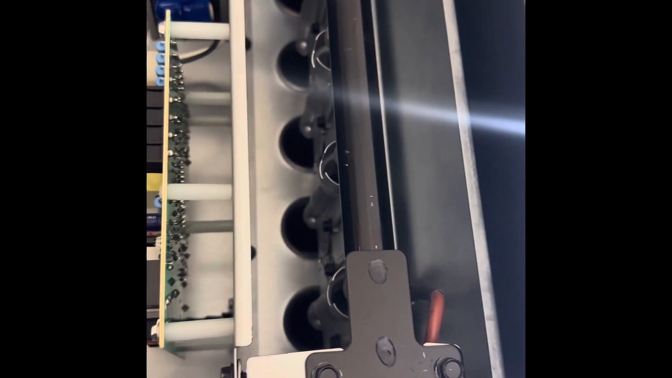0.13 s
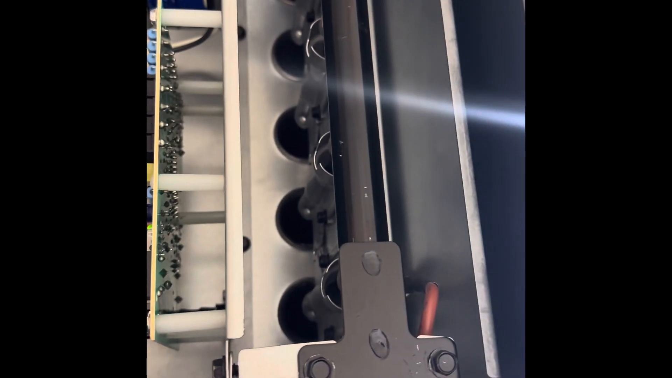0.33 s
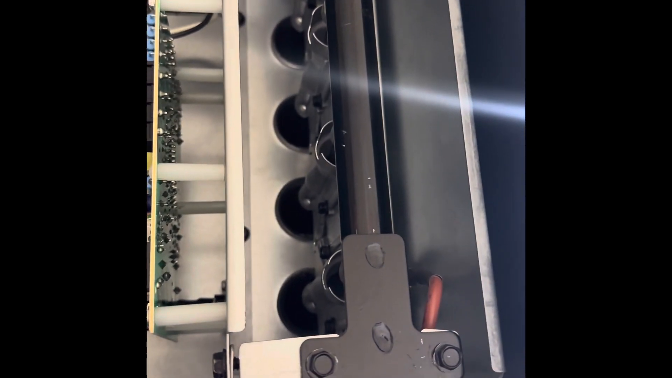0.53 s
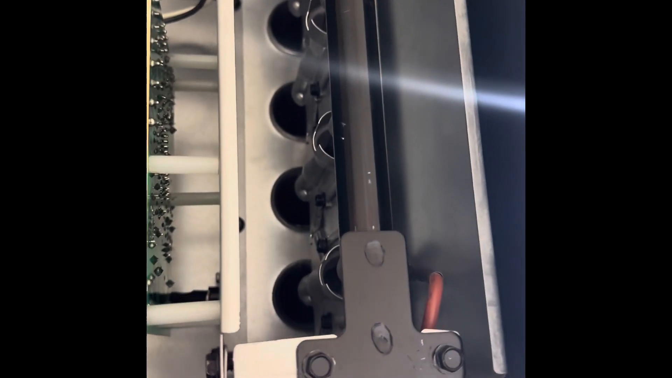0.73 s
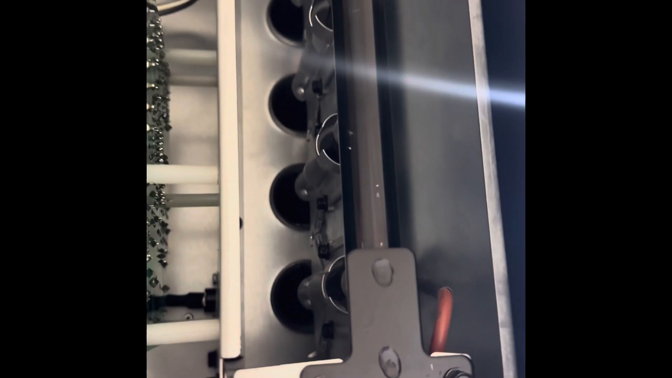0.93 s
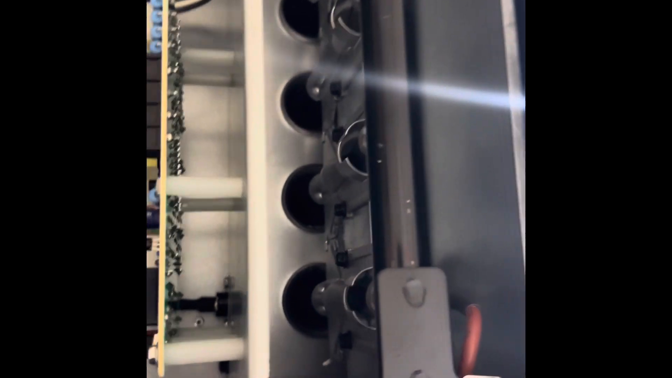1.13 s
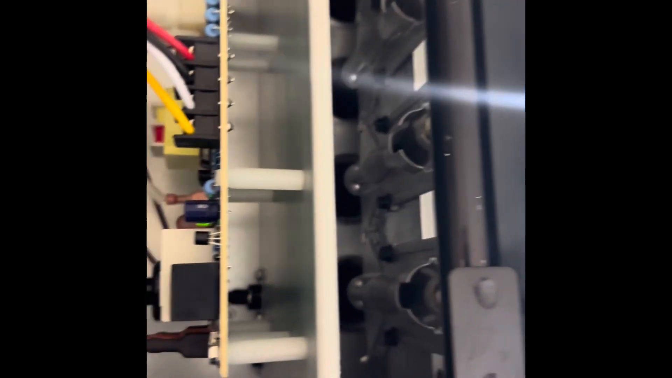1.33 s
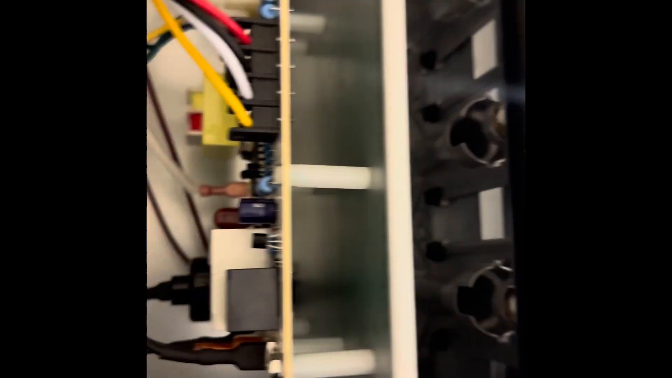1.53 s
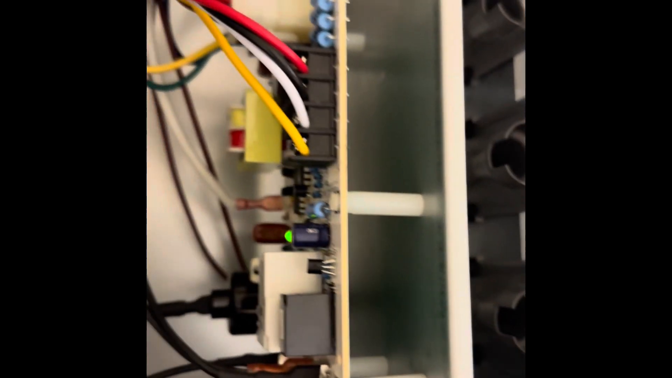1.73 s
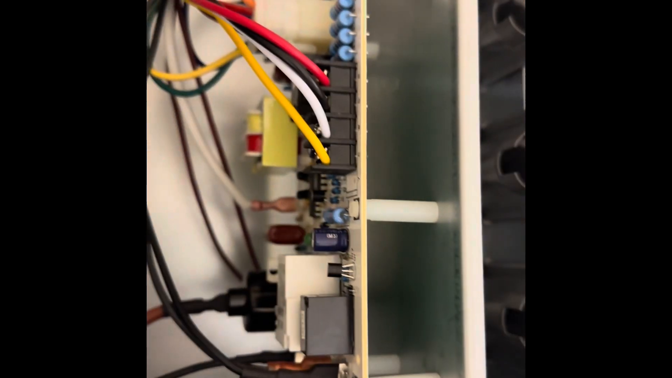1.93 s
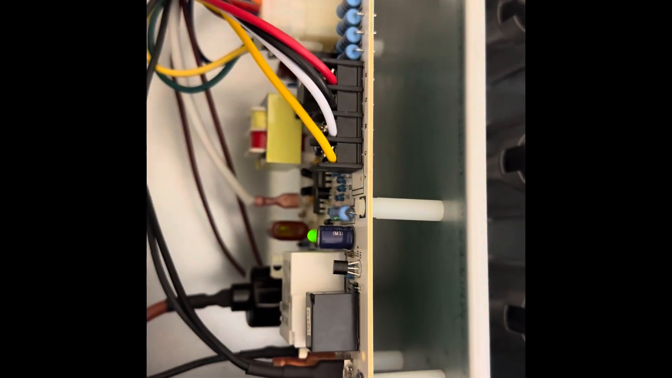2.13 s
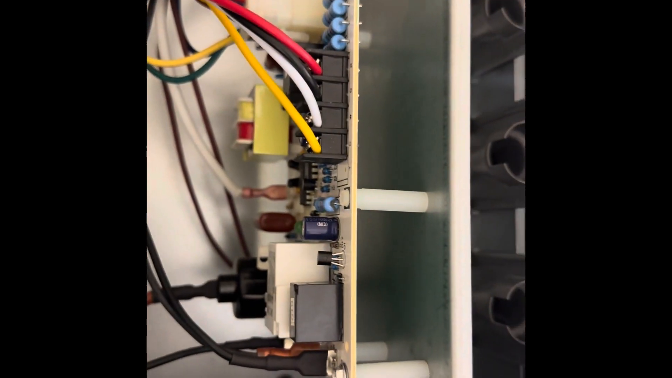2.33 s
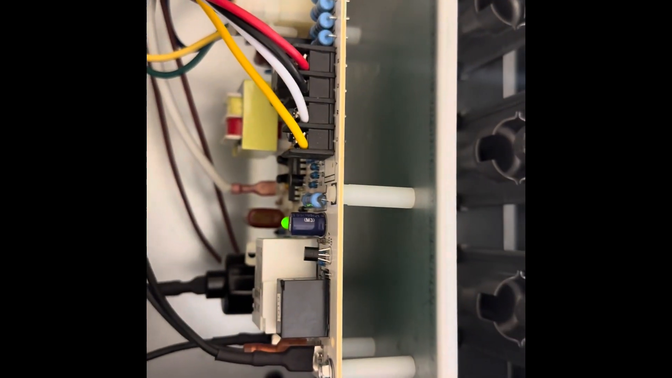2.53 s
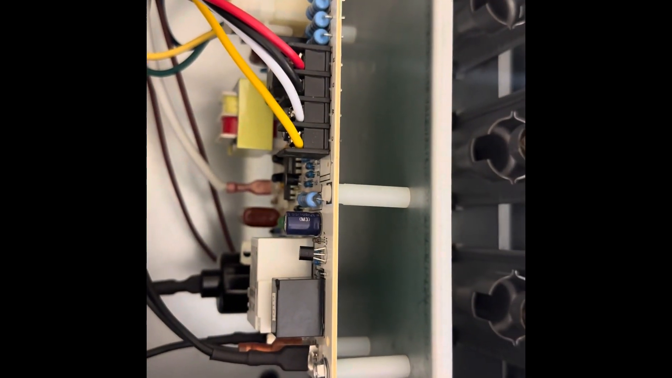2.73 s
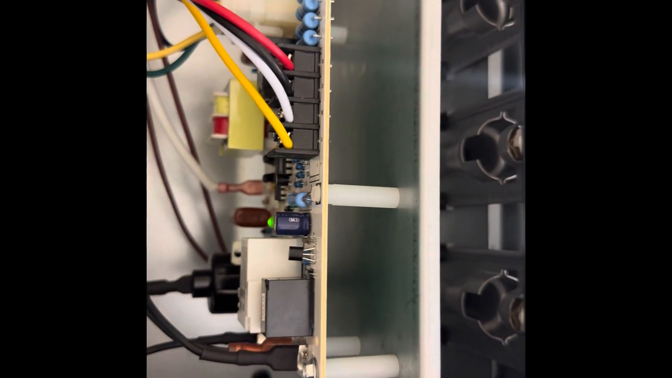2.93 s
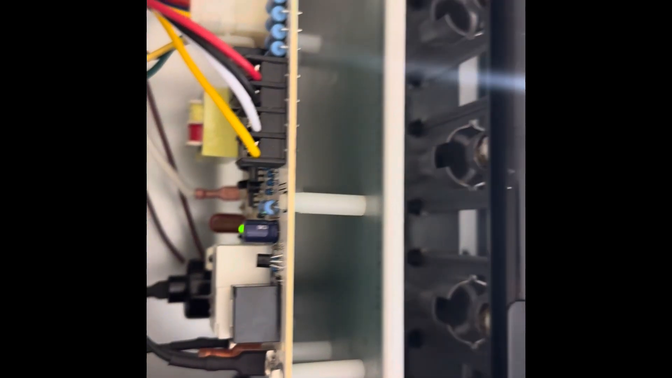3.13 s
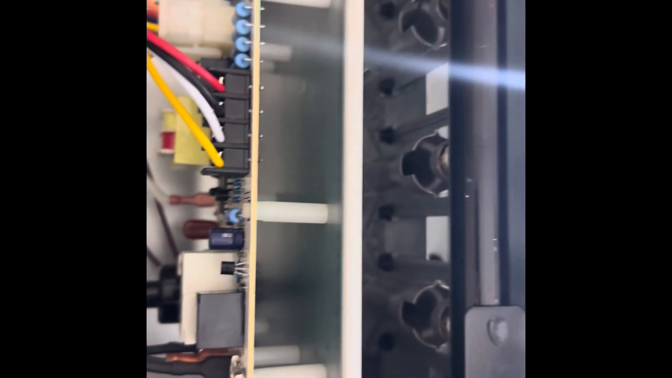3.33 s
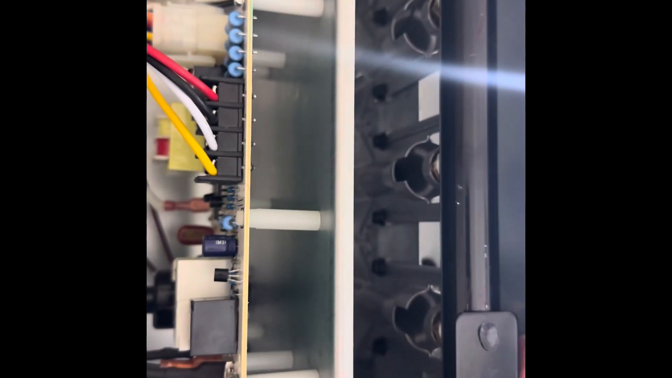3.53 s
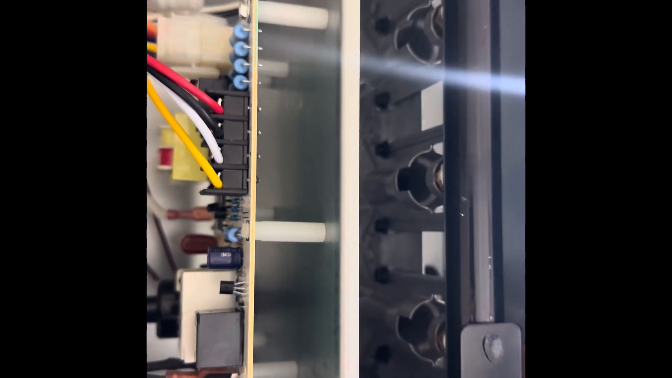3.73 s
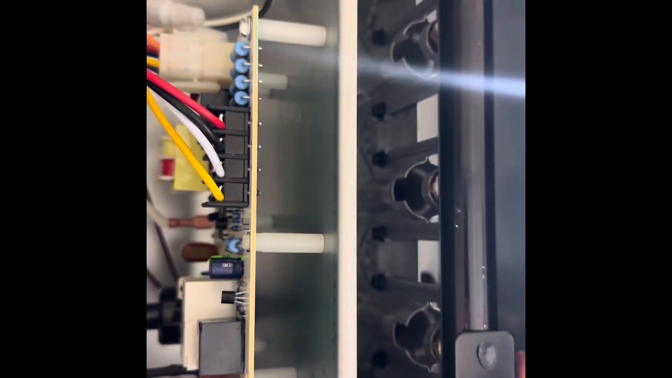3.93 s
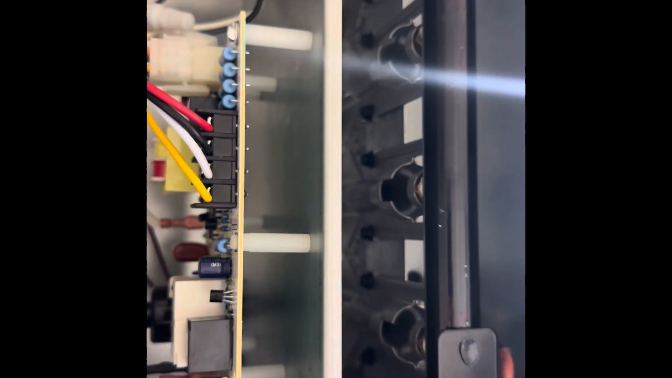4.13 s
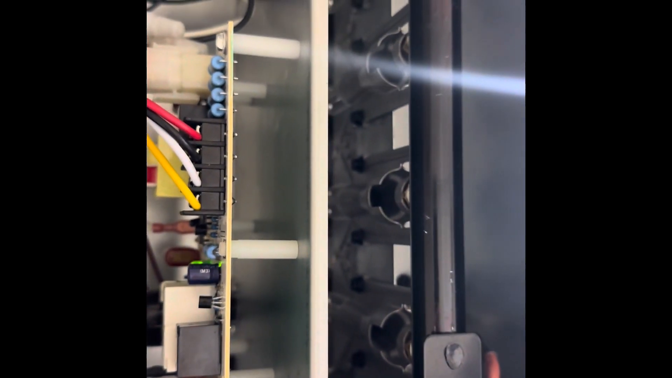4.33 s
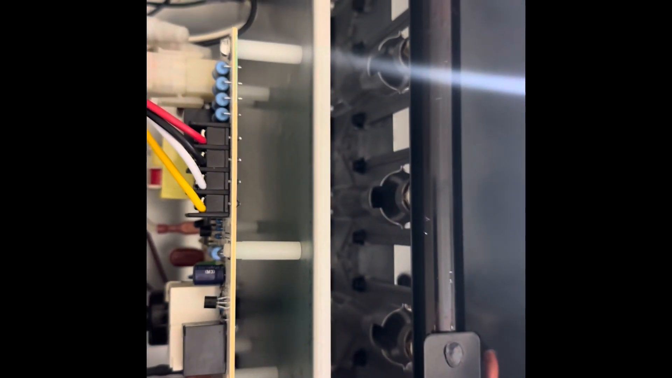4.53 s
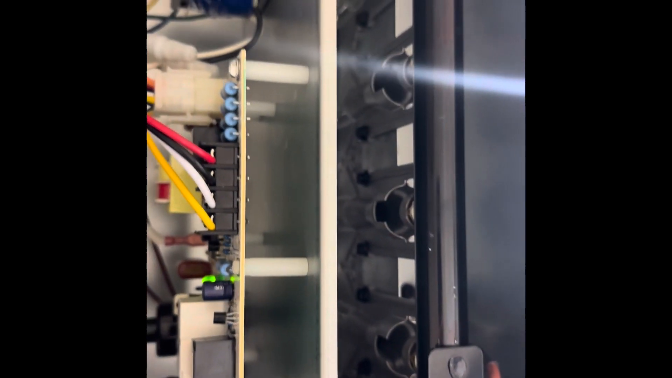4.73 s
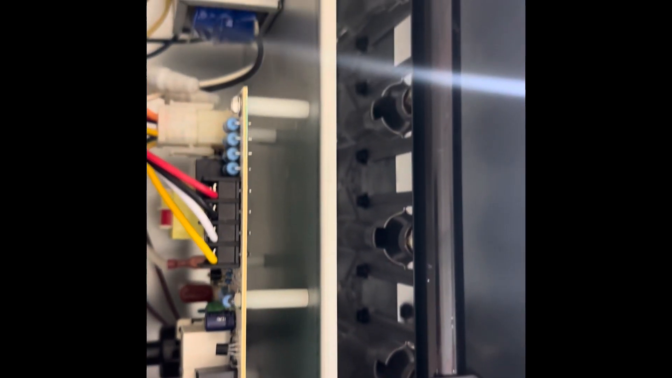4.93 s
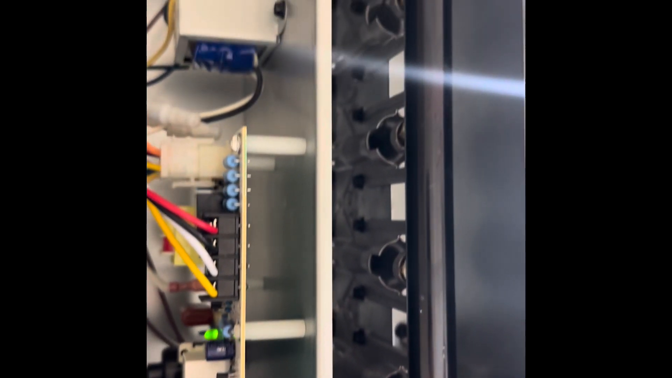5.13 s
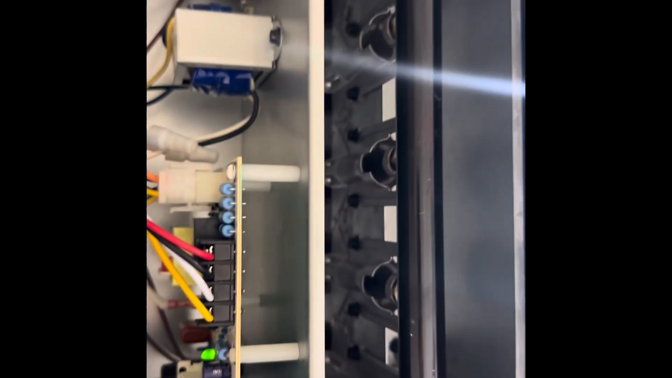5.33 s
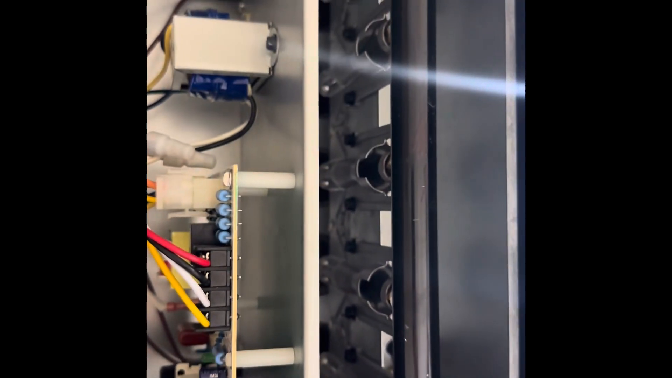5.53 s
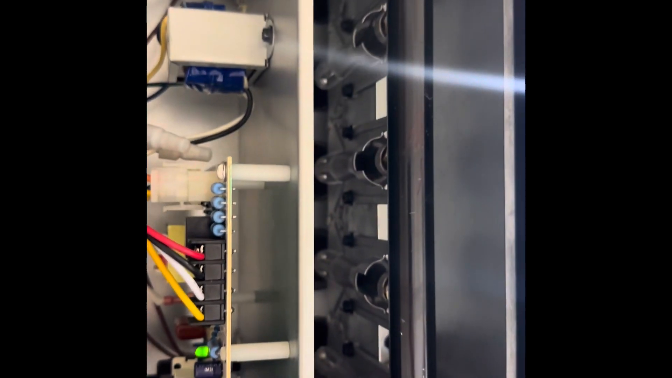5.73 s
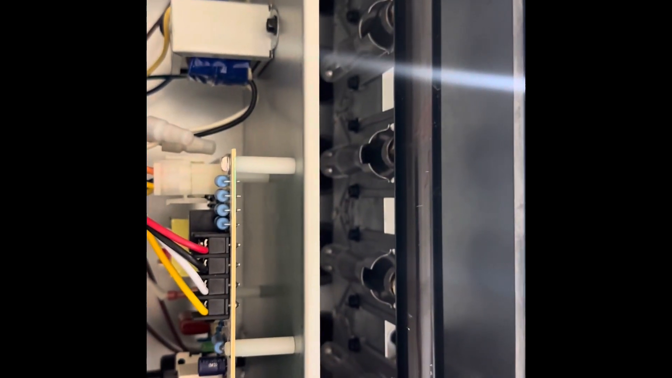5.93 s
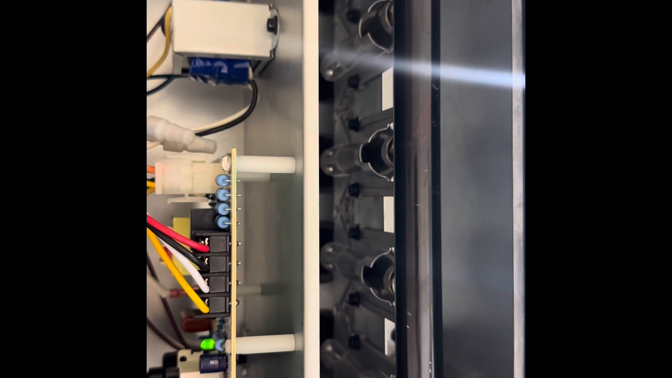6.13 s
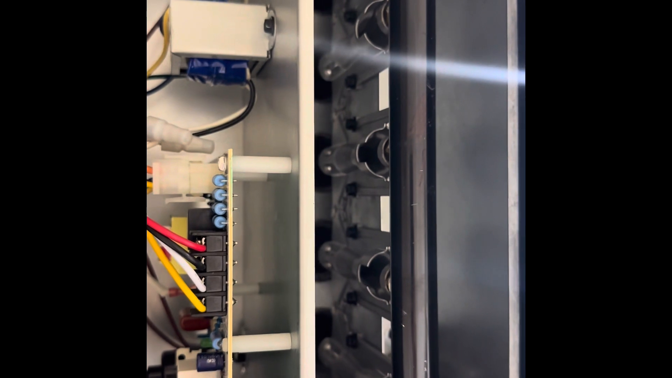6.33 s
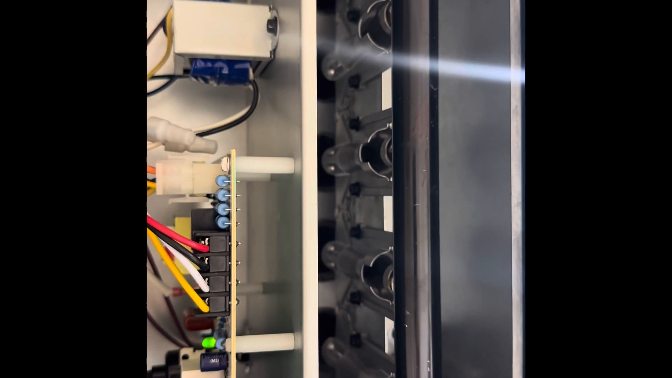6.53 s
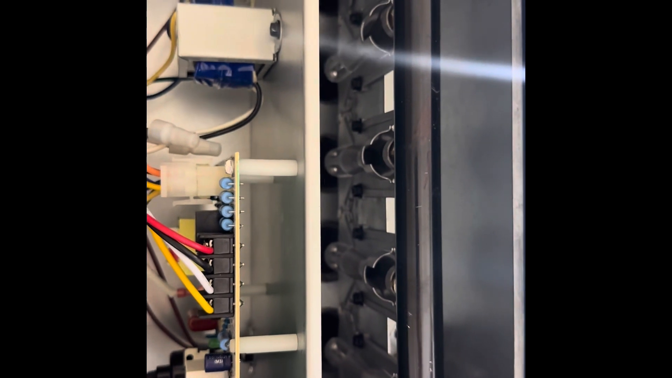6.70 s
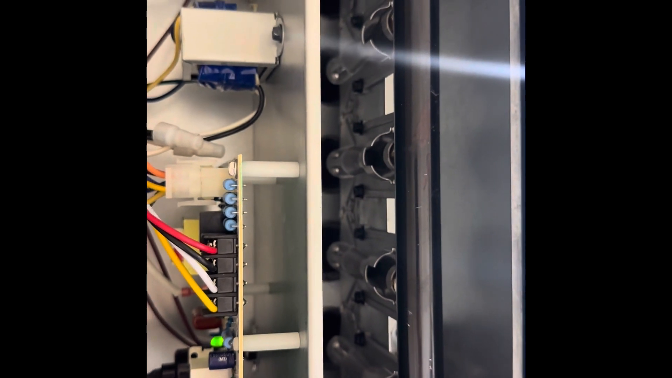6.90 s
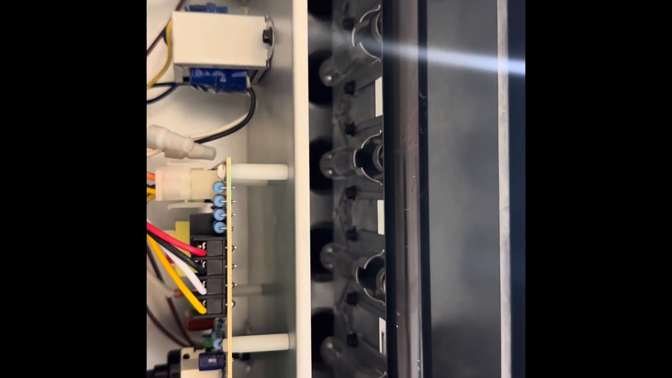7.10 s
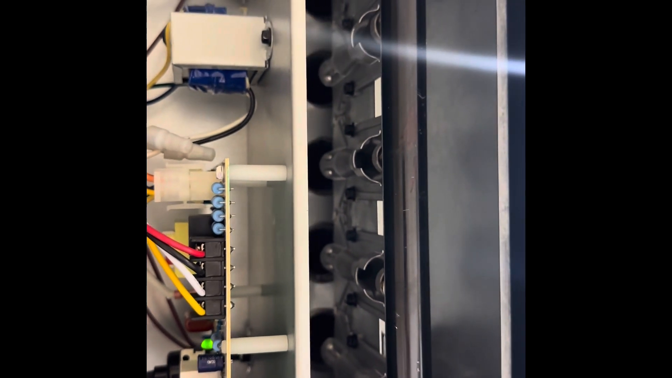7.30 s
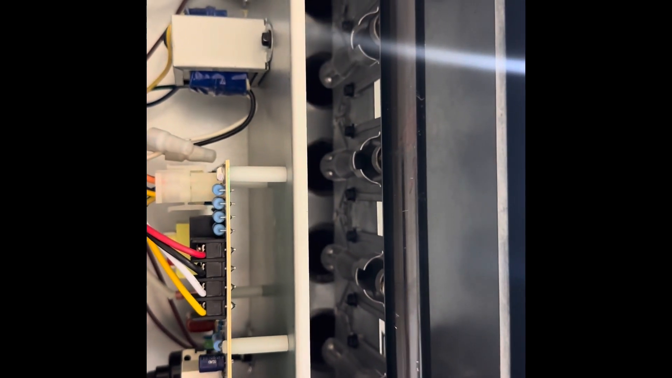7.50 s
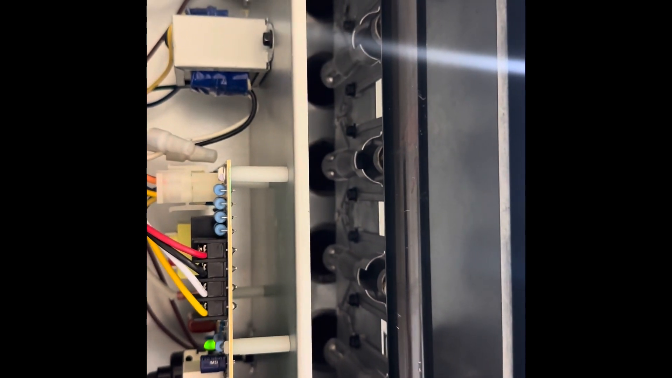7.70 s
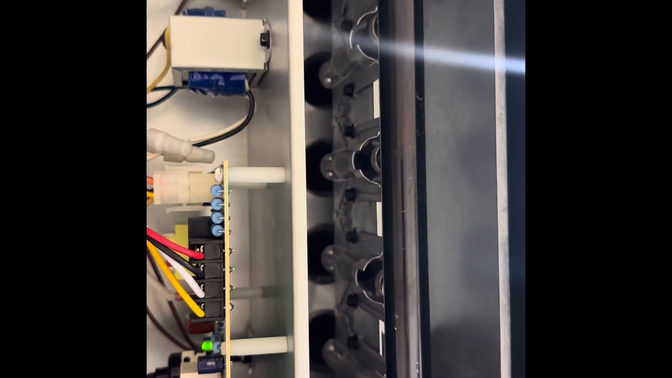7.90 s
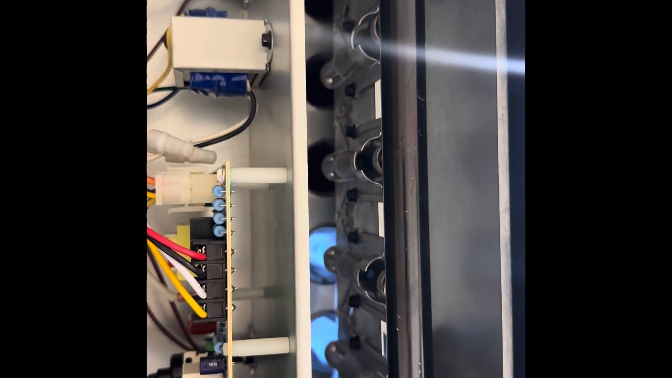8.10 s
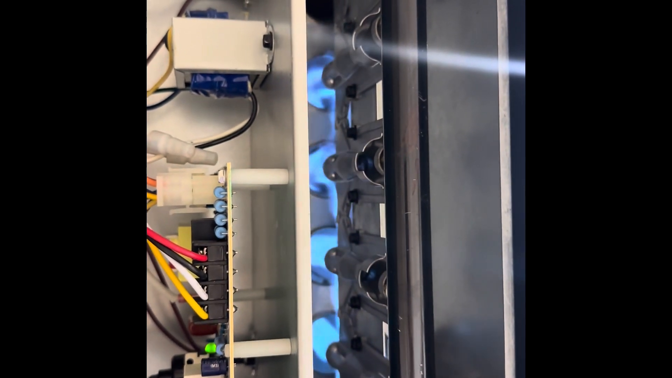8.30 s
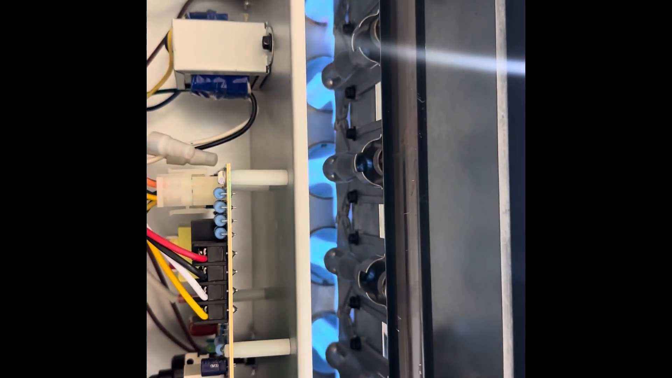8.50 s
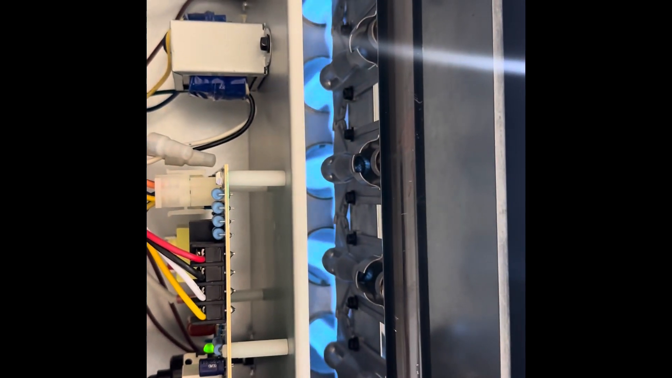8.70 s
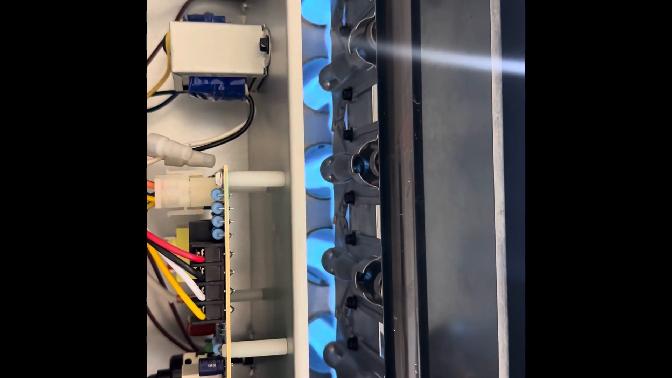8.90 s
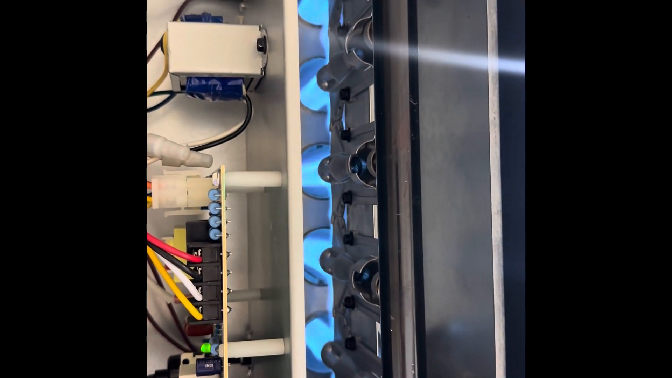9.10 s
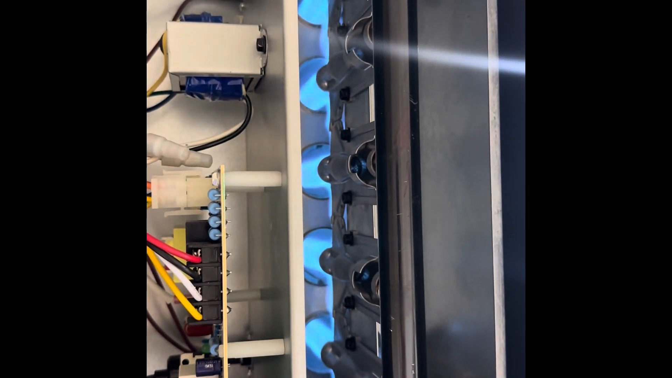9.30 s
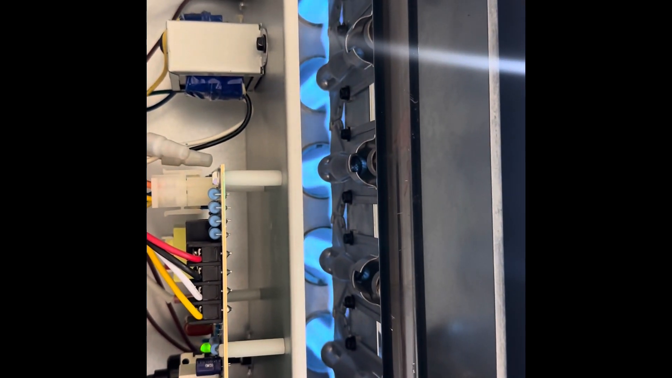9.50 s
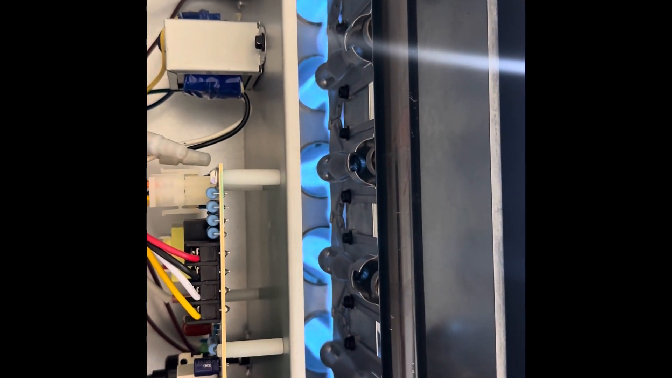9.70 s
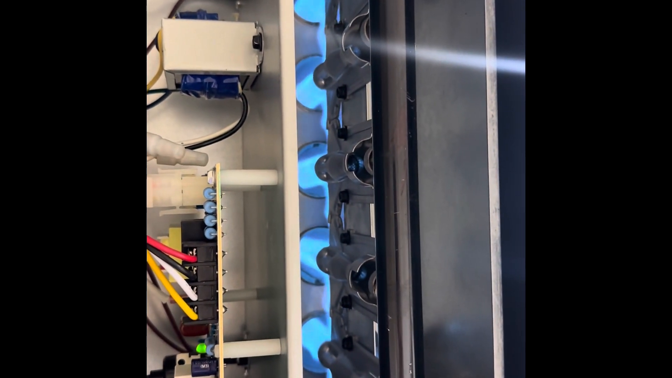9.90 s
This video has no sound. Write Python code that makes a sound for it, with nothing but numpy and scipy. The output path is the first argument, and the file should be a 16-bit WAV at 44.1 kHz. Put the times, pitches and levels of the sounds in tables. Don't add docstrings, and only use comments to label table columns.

```python
import sys
import numpy as np
from scipy import signal
from scipy.fft import rfft, irfft, next_fast_len
from scipy.io import wavfile
from scipy.ndimage import uniform_filter1d

SR = 44100
rng = np.random.default_rng(int(sys.argv[2]) if len(sys.argv) > 2 else 0)


def decibels_to_gain(level_db):
    exponent = np.asarray(level_db, float) / 20
    return 10 ** exponent


def transcribe(u):
    v = np.clip(np.atleast_2d(u).T, -1, 1)
    q = np.round(v * 32767).astype(np.int16)
    wavfile.write(sys.argv[1], SR, q)


N = 438794
T = np.arange(N) / SR

# [t/s, hum gain/dB, intake hiss gain/dB]
LISTENER = [(0, 1.5, -3.5), (.9, 0, -2.5), (1.5, 0.5, 2), (2.7, 1, -1), (3.85, -0.3, 1.5), (4.6, 2, 0.5),
            (5.9, -0.5, -0.5), (6.9, 1.5, 3), (8.8, -0.1, -7), (9.95, 3, -5)]
# [f/Hz, level/dB per Hz]
DRAUGHT = [(28, -49), (38, -26), (50, -10), (75, 0.5), (140, -5.5), (180, -2), (300, -9.5), (365, 1),
           (450, -13), (700, -14), (1000, -17.5), (1600, -22), (2500, -24), (9000, -81)]
# [f/Hz, level/dB per Hz]
INTAKE = [(760, -35), (1300, -5.5), (2330, -12.5), (2800, -7), (3900, -9.5), (4600, -14), (4950, -18.5),
          (5300, -11.5), (6500, -10.5), (7300, -8), (8600, -12), (10100, -20), (10700, -51), (15700, -31.5),
          (16000, -98)]
# [f/Hz, width/Hz, level/dB, t/s, span/s]
DUCTS = [(1905, 61, 8, 4, 6), (2700, 140, 9, 5.7, 6.6), (3490, 53, 6, 2.8, 8.8), (3870, 85, 7, 4, 6.5),
         (5900, 140, 9, .3, 1.1), (7700, 90, 8.5, .4, .9), (7550, 50, 4, .4, .8), (7000, 120, 3, 1.2, .5),
         (7720, 100, 4, 1.9, .6), (7350, 120, 6, 2.7, .7), (8400, 60, 5.5, 2.8, 1.8),
         (8800, 60, 6, 2.3, 1.3), (7280, 140, 8.5, 4, 0.74), (7640, 120, 9, 3.9, .5),
         (6990, 150, 8.5, 5, 1.5), (7720, 90, 7.5, 5.7, .6), (7100, 70, -2, 6.8, .7),
         (8700, 60, 3, 5.6, .8), (6230, 60, 9.5, 5.1, 1)]
DRAUGHT_DB, HISS_DB = -31.5, -43
BEAM_HZ, LOW_SHARE = 5000, 0.41

MAINS_HZ, SHAFT_HZ = 59.975, 56.5
# [multiple of the hum, multiple of the shaft, level/dB against the hum]
MOTOR = [(0, 2, -21), (1, -1, -24), (1, 1, -33.5), (3, 0, -23), (4, 0, -28), (5, 0, -30.5), (0, 10, -43.5),
         (6, 0, -34.5), (7, 0, -34), (0, 17, -39), (0, 21, -36), (1, 20, -38), (0, 28, -37)]
HUM_DB, SHAFT_DB = -22.5, -31
SECOND_DB, ANTINODE_S, ANTINODE_WIDE_S, ANTINODE_DB = -26, 1.63, 0.49, 9.5

FIRST_SPARK_S, LIT_S = 6.1503, 8.0
# [f/Hz, level/dB per Hz]
COLD = [(500, -35), (1000, -3), (2100, -11), (3700, -7), (4900, -11), (5700, -8), (8200, -7.5), (9500, 1),
        (10200, -11), (11900, -25.5), (13200, -22), (14000, -13.5), (15650, -9.5), (16000, -33),
        (16700, -33.5)]
# [f/Hz, level/dB per Hz]
HOT = [(500, -33.5), (1000, -6), (2100, -8.5), (3000, -11), (3700, -7), (5000, -12), (5800, -4),
       (7500, -7.5), (9000, 2.5), (10300, -6.5), (12300, -34), (13500, -18.5), (15600, -11.5),
       (16000, -25.5), (16700, -32)]
# [f/Hz, width/Hz, level/dB over the colour]
COLD_RINGS = [(2720, 83, 2.5), (3080, 27, 9.5), (3686, 34, 10.5), (3890, 120, 5), (5660, 55, 8.5),
              (5860, 120, 5), (6850, 89, 10), (7460, 140, 11.5), (7870, 70, 7.5), (8300, 68, 8),
              (8570, 43, -1), (8880, 290, 10), (9300, 200, -4), (15800, 260, 3)]
# [f/Hz, width/Hz, level/dB over the colour]
HOT_RINGS = [(2130, 44, 10.7), (2600, 350, 3.2), (3460, 51, 6.7), (3700, 170, 5.4), (4170, 190, 7.4),
             (4730, 230, 2), (5370, 100, 3), (5860, 98, 10.3), (6320, 53, 6.6), (7030, 120, 7.7),
             (7700, 150, 2.7), (8240, 200, 4), (8600, 200, 0.5), (15500, 270, 6)]
# [t/s, level/dB over SPLIT_HZ, level/dB under it]
COLD_ECHOES = [(0, 3, -9), (.00046, -1, 0), (.001, -10, -1), (.0015, -7, -12), (.002, -6, -20),
               (.003, -10, -14), (.0038, -12, -4), (.0084, -20, -4)]
# [t/s, level/dB over SPLIT_HZ, level/dB under it]
HOT_ECHOES = [(0, 1, -6), (.00035, -4, -1), (.001, -6, 1), (.0015, -5, -8), (.002, -4, -9),
              (.0025, -5, -12), (.0032, -8, -9), (.0045, -12, -14)]
SPLIT_HZ = 5300
SPARK_DB, FRESH_DB, SETTLE_S = -30.5, 1.5, 0.59

# [t/s, level/dB, low share/dB, stem share/dB, rise/s]
CLACKS = [
    (7.0885, -24, -15, -10, .001),
    (7.0962, -13, -15, -8, .003),
    (7.1075, -14, -15, 8, .003),
    (7.1123, -14, 13, 4, .001),
    (7.122, -14.5, 9, 0, .002),
]
# [f/Hz, level/dB, t60/s]
VALVE_HIGH = [(6240, 6, 0.025), (7000, -1, 0.031), (6940, 10, 0.025), (7830, 7, 0.03), (8550, 7, 0.021),
              (5700, 1, 0.035), (9450, 4, 0.032)]
# [f/Hz, level/dB, t60/s]
VALVE_LOW = [(1320, 3, 0.045), (1480, -4.5, 0.04), (2134, -9.5, 0.1), (1842, -13, 0.02)]
# [f/Hz, level/dB, t60/s]
STEM = [(2950, 3.5, 0.056), (3180, -1, .04)]
# [f/Hz, level/dB per Hz]
RATTLE = [(400, -28), (1000, -2), (2000, -1), (3000, -4), (4800, -8.5), (7000, 0), (9500, -6), (12000, -21),
          (15500, -19), (17000, -48)]
# [t/s, f/Hz, level/dB, t60/s]
THUMP = [
    (7.119, 175, -14, 0.23),
    (7.1216, 196.6, -17.5, 0.36),
]

# [f/Hz, level/dB per Hz]
ROAR = [(26, -49), (40, -14), (60, 6.5), (100, 6.5), (190, 0.5), (260, -8), (340, -3), (500, -22.5),
        (1000, -17), (2500, -56), (8000, -85)]
CATCH_S, SPREAD_S, FAINT_DB, FULL_DB, GROWTH_DB_PER_S = 7.97, 0.71, -38, -27, 0.5
TUBE_HZ, TUBE_WIDE_HZ, TUBE_DB, TUBE_WARM_S = 342, 35, -11.5, 1.5
# [t/s, level/dB, start pitch/Hz, length/s]
WHOOMPS = [
    (8.224, -18, 170, 0.022),
    (8.237, -18, 435, 0.012),
    (8.281, -16, 322, 0.014),
    (8.298, -17, 145, .014),
    (8.362, -11, 214, 0.009),
    (8.3757, -15, 444, 0.0069),
    (8.508, -25.5, 250, 0.012),
    (9.079, -20.5, 250, 0.0096),
]
SAG = 0.59
# [t/s, level/dB, length/s]
POPS = [
    (8.221, -23, 0.068),
    (8.267, -22, 0.03),
    (8.3, -22, 0.012),
    (8.35, -22.5, 0.037),
    (8.367, -18, 0.027),
    (8.505, -25.5, 0.023),
    (7.937, -28.5, 0.089),
]
# [f/Hz, level/dB per Hz]
PUFF = [(30, -35), (80, 2.5), (170, -1), (350, -1.5), (600, -15.5), (1000, -13.5), (2000, -34), (7000, -78)]

# [f/Hz, likeness 0..1]
SAME = [(300, 1.0), (450, .99), (800, .84), (1700, .99), (2050, .95), (2500, .6), (3100, .3), (3800, .7),
        (4700, .3), (5300, .45), (5800, .95), (7500, .9), (9200, .93), (10500, .78), (12500, .97),
        (15500, .8)]
# [f/Hz, phase/rad]
LEAD = [(2000, 0), (2800, .4), (3300, 0), (4300, 0), (5000, 2.6), (5400, .2), (6200, 0), (8000, -1.05),
        (10000, -2), (11300, -3.1), (13500, -3.15), (15500, -4.1)]
# [f/Hz, level/dB]
TILT = [(40, 0.45), (150, 0.86), (400, 1.8), (800, -1.1), (1600, -0.016), (2600, 0), (4000, -0.5),
        (5300, -1.4), (6000, 0.52)]
# [low f/Hz, high f/Hz, threshold/dB in long blocks, in short blocks]
FAINT = [(4800, 5100, -75, -72), (9300, 9700, -77, -80), (9700, 10000, -75, -76), (10000, 10300, -76, -74),
         (10300, 10700, -74, -71), (10700, 11500, -72, -68), (11500, 12600, -74, -70),
         (12600, 13700, -72, -66), (13700, 14500, -69, -60), (14500, 15200, -69, -59),
         (15200, 15900, -70, -59), (15900, 16700, -60, -65), (16700, 22100, 0, -55)]
SIDE_SPARE_DB, SPARE_FROM_HZ = (13, 9), 8400


def evened(x):
    return x / np.sqrt(np.mean(x ** 2) + 1e-20)


def read(points, hz):
    f, value = np.transpose(points)
    return np.interp(np.log(hz + 1), np.log(f + 1), value)


def add(mix, s, sound):
    part = mix[..., round(s * SR):][..., :sound.shape[-1]]
    part += sound[..., :part.shape[-1]]


def coloured(x, colour):
    size = next_fast_len(x.shape[-1] + 2048)
    gain = decibels_to_gain(read(colour, np.fft.rfftfreq(size, 1 / SR)))
    return irfft(rfft(x, size) * gain, size)[..., :x.shape[-1]]


def wander(hz):
    steps = np.arange(0, T[-1] + 1, 1 / hz)
    drift = np.interp(T, steps, rng.standard_normal(len(steps)))
    return evened(uniform_filter1d(drift, size=999))


def listener(column):
    rows = np.transpose(LISTENER)
    return decibels_to_gain(np.interp(T, rows[0], rows[column]))


def air(colour, patchy_db, size, count, ducts=(), length=N):
    frames, hz = length // 512 + 5, np.fft.rfftfreq(2048, 1 / SR)
    a, b, c, d, patches = rng.standard_normal((frames, 1025, 5)).T
    field_db = patchy_db * evened(uniform_filter1d(uniform_filter1d(patches, size, 0), count, 1))
    frame_s = np.arange(frames) * 512 / SR
    for centre, width, db, s, span in ducts:
        peak_db = db / (1 + (2 * (hz - centre) / width) ** 2)
        field_db += np.outer(peak_db, np.exp(-((frame_s - s) / span) ** 2))
    z = np.array([a + 1j * b, c + 1j * d]) * decibels_to_gain(read(colour, hz)[:, None] + field_db)
    return evened(signal.istft(z, nperseg=2048, noverlap=1536)[1][:, :length])


def blower():
    throb = 1 + 0.084 * np.cos(2 * np.pi * SHAFT_HZ * T) + 0.11 * np.cos(4 * np.pi * MAINS_HZ * T)
    whole = air(INTAKE, patchy_db=3.0, size=3, count=100, ducts=DUCTS)
    low = signal.sosfiltfilt(signal.butter(2, BEAM_HZ, fs=SR, output="sos"), whole)
    near = listener(2)
    hiss = evened(low * near ** LOW_SHARE + (whole - low) * near) * throb * decibels_to_gain(HISS_DB)
    return decibels_to_gain(DRAUGHT_DB) * air(DRAUGHT, patchy_db=1.5, size=5, count=12) + hiss


def motor():
    hum = 4 * np.pi * MAINS_HZ * T
    shaft = 2 * np.pi * np.cumsum(SHAFT_HZ + 0.0516 * wander(2.5)) / SR
    sides = np.zeros(N)
    for m, k, db in MOTOR:
        sides += decibels_to_gain(db + 2.75 * wander(4.5)) * np.sin(m * hum + k * shaft + 1.3 * wander(28))
    swell = np.exp(-((T - ANTINODE_S) / ANTINODE_WIDE_S) ** 4)
    second = decibels_to_gain(SECOND_DB + ANTINODE_DB * swell) * np.sin(2 * hum + .5 * wander(6.5))
    hums = decibels_to_gain(HUM_DB) * listener(1) * (np.sin(hum) + sides + second)
    return np.sqrt(2) * (hums + decibels_to_gain(SHAFT_DB) * np.sin(shaft))


def crack(colour, rings, echoes, tail_db, t60):
    t, hz = np.arange(4096) / SR, abs(np.fft.fftfreq(4096, 1 / SR))
    clicks = np.zeros((2, 2, 4096))
    for s, *db in echoes:
        far = s > .0006
        at = (40 + s * SR * rng.uniform(0.93, 1.07, 2) ** far).astype(int)
        clicks[:, [0, 1], at] += decibels_to_gain(np.array(db))[:, None] * rng.choice([-1, 1], 2) ** far
    tail = decibels_to_gain(tail_db - 60 * t / t60) * rng.standard_normal((2, 4096))
    clicks += tail * np.clip((t - 40 / SR) / .001, 0, 1)
    high, low = np.fft.fft(clicks)
    z = high + (low - high) / (1 + (hz / SPLIT_HZ) ** 12)
    z /= np.sqrt(uniform_filter1d(abs(z) ** 2, size=16, mode="wrap"))
    tops = 1
    for centre, width, db in rings:
        tops = tops + (decibels_to_gain(2 * db) - 1) / (1 + (2 * (hz - centre) / width) ** 2)
    gain = np.log(decibels_to_gain(read(colour, hz)) * np.sqrt(np.maximum(tops, .1)))
    return evened(np.fft.ifft(z * np.exp(np.conj(signal.hilbert(gain)))).real)


def arcs(colour, rings, echoes, tail_db, t60):
    return [crack(colour, rings, echoes[2 * (k > 0):], tail_db, t60) for k in range(7)]


def igniter():
    cycles = np.arange(int((T[-1] - FIRST_SPARK_S) * MAINS_HZ) + 1)
    late, size, path = rng.standard_normal((len(cycles), 3)).T
    at = FIRST_SPARK_S - 40 / SR + cycles / MAINS_HZ + 0.0001 * late
    stray = 1 + (abs(path) * 99).astype(int) % 6
    cold = arcs(COLD, COLD_RINGS, COLD_ECHOES, tail_db=-22, t60=.05)
    hot = arcs(HOT, HOT_RINGS, HOT_ECHOES, tail_db=-17.5, t60=.045)
    out = np.zeros((2, N))
    for s, db, k in zip(at, size, stray):
        lit = np.pi / 2 * np.clip((s - LIT_S) / .2 + .5, 0, 1)
        cold_spark = decibels_to_gain(.6 * db) * np.cos(lit) * (cold[0] + .5 * cold[k])
        hot_spark = decibels_to_gain(1.1 * db) * np.sin(lit) * (hot[0] + .75 * hot[k])
        add(out, s, cold_spark + hot_spark)
    fresh_db = FRESH_DB * np.exp(-abs(T - FIRST_SPARK_S) / SETTLE_S)
    return decibels_to_gain(SPARK_DB + fresh_db) * out / np.sqrt(np.mean(out[:, round(FIRST_SPARK_S * SR):] ** 2))


def ring(modes, t):
    out = 0
    for hz, db, t60 in modes:
        out = out + decibels_to_gain(db - 60 * t / t60) * np.sin(2 * np.pi * (hz * t + rng.random((2, 1))))
    return out


def valve():
    t, out = np.arange(9000) / SR, np.zeros((2, N))
    for s, db, low_db, stem_db, rise in CLACKS:
        noise = evened(coloured(rng.standard_normal((2, len(t))), RATTLE))
        rattle = decibels_to_gain(-4.5 - 60 * t / 0.063) * noise
        body = 0.39 * ring(VALVE_HIGH, t)
        body += 0.17 * decibels_to_gain(low_db) * ring(VALVE_LOW, t)
        body += 0.19 * decibels_to_gain(stem_db) * ring(STEM, t)
        add(out, s, decibels_to_gain(db) * (body + rattle) * np.minimum(t / rise, 1))
    for s, hz, db, t60 in THUMP:
        add(out, s, decibels_to_gain(db - 60 * t / t60) * np.sin(2 * np.pi * hz * t) * np.minimum(t / 0.013, 1))
    return out


def flame():
    spread = np.clip((T - CATCH_S) / SPREAD_S, 0, 1)
    growth_db = GROWTH_DB_PER_S * np.maximum(T - CATCH_S - SPREAD_S, 0)
    roar_db = FAINT_DB + (FULL_DB - FAINT_DB) * spread + growth_db
    fire = air(ROAR, patchy_db=3.0, size=9, count=4, length=N // 4)
    fire = np.pad(fire, ((0, 0), (N - N // 4, 0)))
    out = decibels_to_gain(roar_db) * np.minimum(10 * spread, 1) * fire * decibels_to_gain(0.33 * wander(23))
    peak = signal.iirpeak(TUBE_HZ, TUBE_HZ / TUBE_WIDE_HZ, SR)
    tube = evened(signal.lfilter(*peak, rng.standard_normal((2, N))))
    out += decibels_to_gain(roar_db + TUBE_DB) * np.clip((T - CATCH_S) / TUBE_WARM_S, 0, 1) ** 2 * tube
    for s, db, hz, length in WHOOMPS:
        u = np.arange(0, 1, 1 / (length * SR))
        pulse = np.sin(2 * np.pi * hz * length * (u - SAG * u ** 2 / 2))
        add(out, s, decibels_to_gain(db) * np.sin(np.pi * u ** 0.44) * pulse)
    t = np.arange(4000) / SR
    for s, db, length in POPS:
        puff = evened(coloured(rng.standard_normal((2, len(t))), PUFF))
        add(out, s, decibels_to_gain(db) * puff * (t / length * 6) * np.exp(1 - t / length * 3) / 2)
    return out


def scene():
    return motor() + blower() + igniter() + valve() + flame()


def thinned(pair, size, luck_db):
    short = int(size < 512)
    hz, _, z = signal.stft(pair, SR, "cosine", size)
    blocks = z.shape[2]
    luck = rng.standard_normal((blocks, len(FAINT) + 1))[np.arange(blocks) // (1 + 7 * short)]
    for k, (low_hz, high_hz, *db) in enumerate(FAINT):
        band = (hz >= low_hz) & (hz < high_hz)
        power = (abs(z[:, band]) ** 2).mean(1) * size / 256
        spare_db = np.array([[0], [SIDE_SPARE_DB[short] / (1 + (low_hz < SPARE_FROM_HZ))]])
        limit_db = db[short] + 1.5 * luck[:, k] + luck_db * luck[:, -1] - spare_db
        z[:, band] *= (power > decibels_to_gain(2 * limit_db))[:, None]
    return signal.istft(z, SR, "cosine", size)[1][:, :pair.shape[1]]


def band_limit(x):
    return signal.sosfilt(signal.butter(12, 17160, fs=SR, output="sos"), x)


def record(dry):
    size = next_fast_len(N)
    hz, (a, b) = np.fft.rfftfreq(size, 1 / SR), rfft(dry, size)
    same, lead = np.clip(read(SAME, hz), 0, 1), read(LEAD, hz)
    tilt = decibels_to_gain(read(TILT, hz) / 2)
    right = (same * a + np.sqrt(1 - same ** 2) * b) * np.exp(-1j * lead)
    mid = np.sqrt(np.maximum(1 + same * np.cos(lead), .12) / 2)
    ports = irfft(np.array([a * tilt, right / tilt]) / mid, size)[:, :N]
    ports = signal.sosfilt(signal.butter(2, 36, "highpass", fs=SR, output="sos"), ports)
    turn = np.array([[1, 1], [1, -1]])
    pair = turn @ ports / 2
    cut = round(FIRST_SPARK_S * SR) - 300
    before = thinned(pair[:, :cut], size=2048, luck_db=3.5)
    after = thinned(pair[:, cut:], size=256, luck_db=5.5)
    return band_limit(turn @ np.hstack([before, after]))


dry = scene()
out = record(dry)
transcribe(out)
```